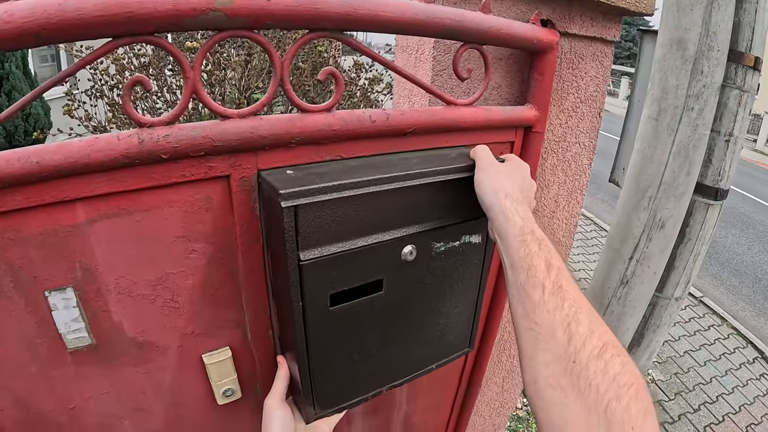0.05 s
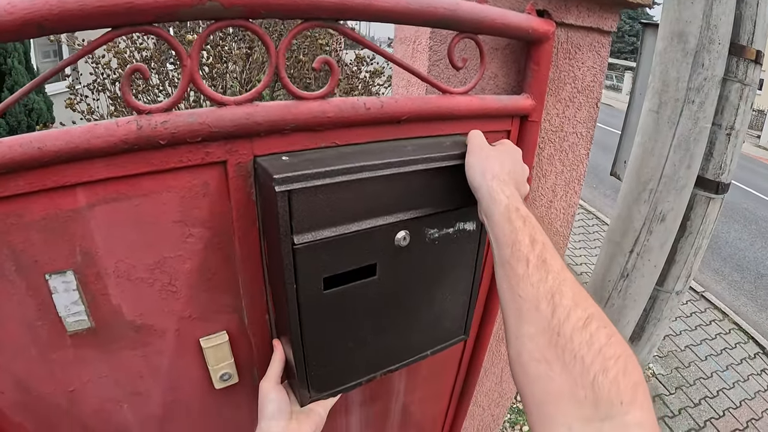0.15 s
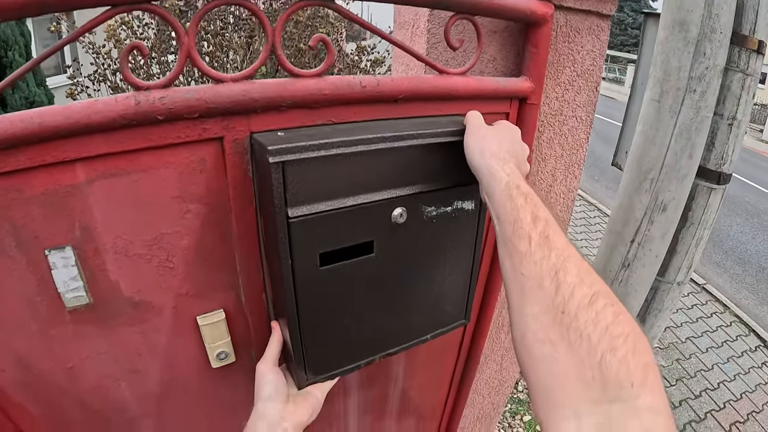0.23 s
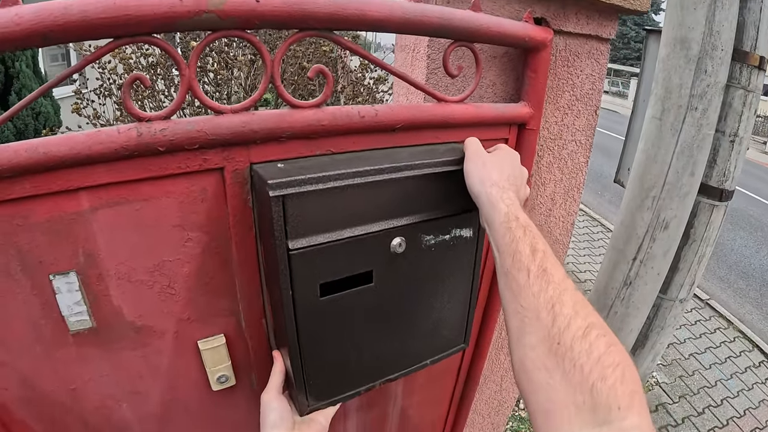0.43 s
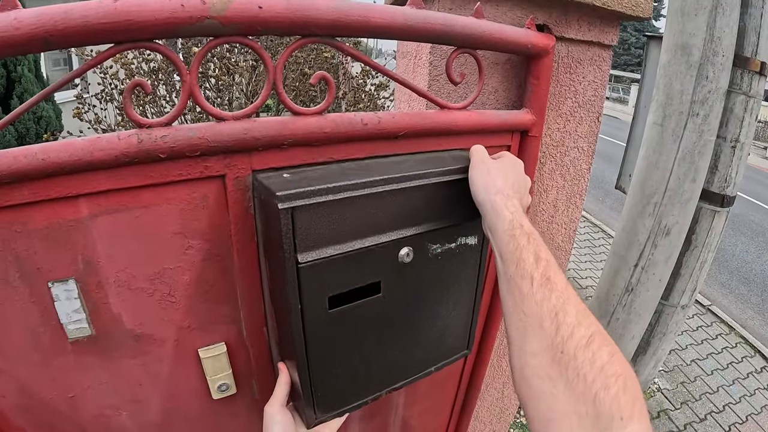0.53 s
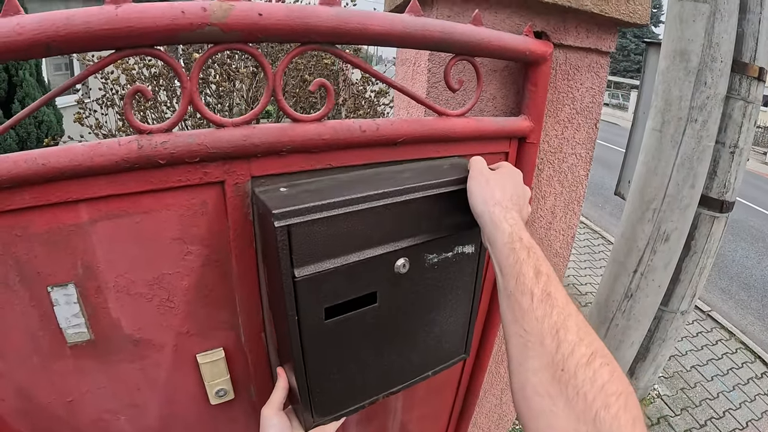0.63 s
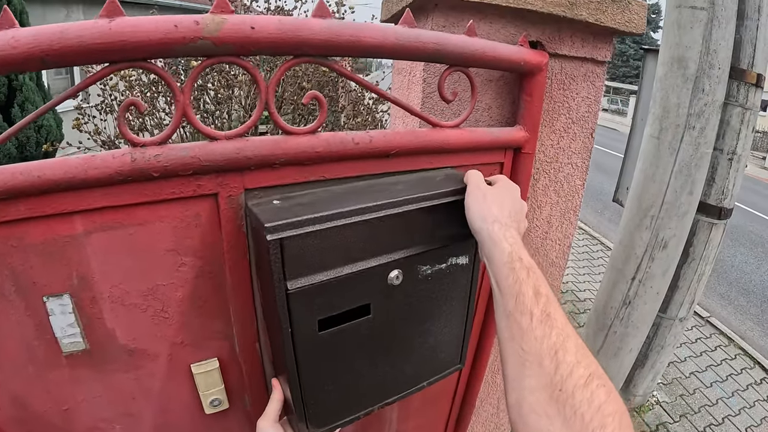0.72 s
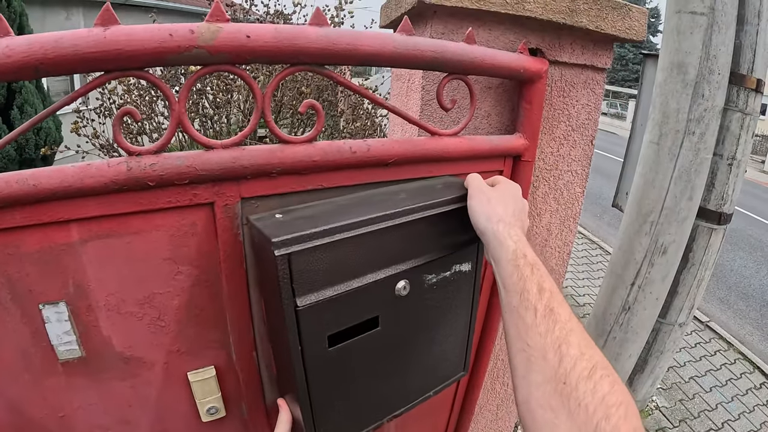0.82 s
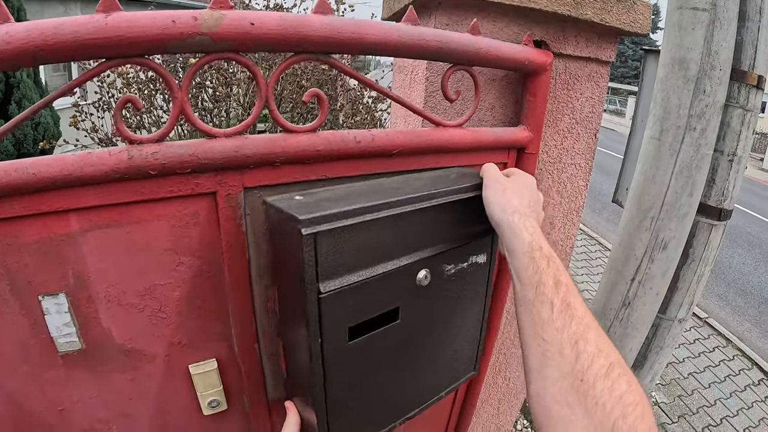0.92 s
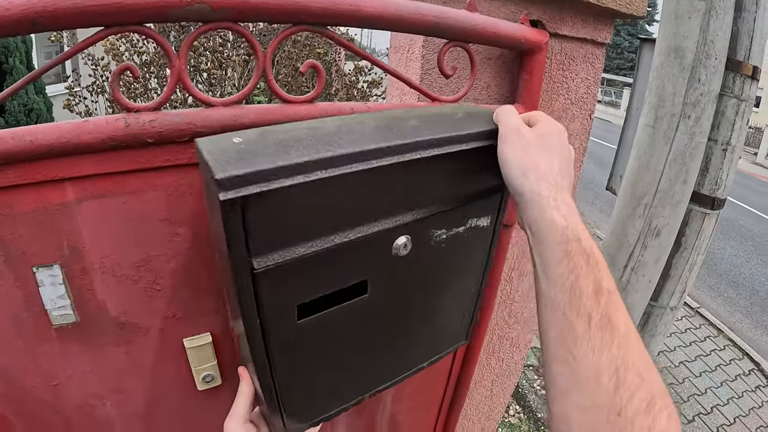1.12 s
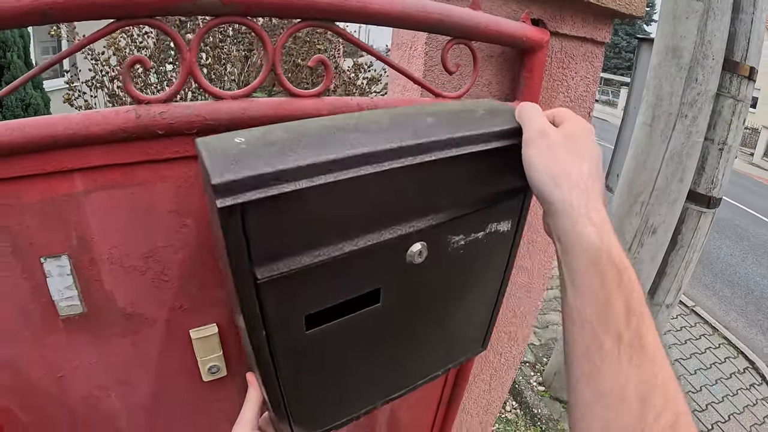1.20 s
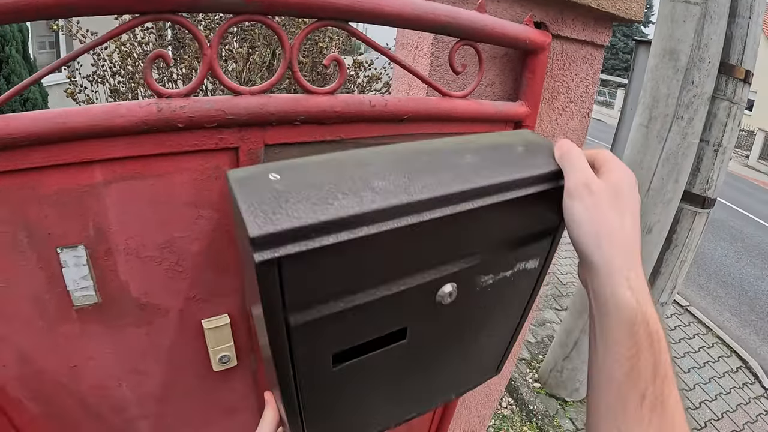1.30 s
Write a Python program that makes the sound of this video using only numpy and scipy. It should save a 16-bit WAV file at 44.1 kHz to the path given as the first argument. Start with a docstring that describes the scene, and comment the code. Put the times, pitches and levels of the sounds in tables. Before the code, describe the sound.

Close outdoor sound of a sheet-metal box pulled about against a gate: clacks and hollow thuds, brief lull, a heavy ringing clatter with squeal, one more strong blow, then fading scrapes and low booms beside a quiet street.

```python
"""A sheet-metal mailbox is worked loose from a steel gate, close to the microphone, beside a quiet street.
Over a steady street murmur its edges start to drag; the hollow box thuds, the gate panel hums low,
edges clack in washes of sheet ringing, and a rubbing edge squeals, a sine gliding in pitch.
After a near pause come louder thuds, clear wall rings and clacks, a second squeal, and one more heavy blow;
then sparse weak clacks and thuds, the drag dying away and last low booms of the panel."""
import sys
import numpy as np
from scipy import signal
from scipy.fft import rfft, irfft
from scipy.io import wavfile
from scipy.ndimage import uniform_filter1d

SR = 44100
rng = np.random.default_rng(int(sys.argv[2]) if len(sys.argv) > 2 else 0)


def digitize_waveform(pressure):
    """Quantize a signal to 16-bit integers and store it at the path in sys.argv[1].

    Rows of a 2-D input are taken as channels; values are limited to [-1, 1].
    """
    field = np.atleast_2d(pressure).T
    bounded = np.clip(field, -1, 1)
    quanta = np.round(bounded * 32767).astype(np.int16)
    wavfile.write(sys.argv[1], SR, quanta)


def amplitude_ratio(level_db):
    """Convert a level in decibels to the matching linear amplitude (field) ratio."""
    exponent = np.asarray(level_db, float) / 20
    return 10 ** exponent


N = 59535
T = np.arange(N) / SR
RUN_IN = 8192   # samples for filters to settle


def rms_one(x):
    """Scales to rms 1."""
    return x / np.sqrt(np.mean(x ** 2) + 1e-20)


def at_hz(points, hz):
    """Reads a spectrum table on a log frequency axis."""
    table_hz, value = np.array(points).T
    return np.interp(np.log(hz), np.log(table_hz), value)


def in_time(rows):
    """Columns of a curve, sample by sample."""
    s, *columns = np.transpose(rows)
    return [np.interp(T, s, column) for column in columns]


def drift(rate_hz):
    """Random wander with rms 1: white noise through a two-pole low-pass."""
    pole = np.exp(-2 * np.pi * rate_hz / SR)
    noise = rng.standard_normal(N + SR)
    return rms_one(signal.lfilter([1], [1, -2 * pole, pole * pole], noise)[SR:])


def decay(age, t60, rise_s):
    """Quick rise, exponential fall; silent before the blow."""
    age = np.maximum(age, 0)
    rise = 1 - np.exp(-age / rise_s)
    return rise * np.exp(-np.log(1000) * age / t60)


def near(hz, centre_hz, octaves):
    """Weight of modes around a favoured pitch."""
    return np.exp(-(np.log2(hz / centre_hz) / octaves) ** 2 / 2)


def struck(start_s, hz, gain, t60, rise_s):
    """Rings a set of modes from one start, neighbours in opposite phase, each with a chance strength."""
    spread_db = 3
    out, i = np.zeros(N), int(start_s * SR)
    age = T[:N - i][:int(0.8 * SR)]   # a ring lasts 0.8 s at most
    polarity = (-1) ** np.arange(len(hz))
    gain = gain * amplitude_ratio(spread_db * rng.standard_normal(len(hz))) * polarity
    ring = decay(age, t60[:, None], rise_s) * np.sin(2 * np.pi * hz[:, None] * age)
    out[i:i + len(age)] = gain @ ring
    return out


def bands(spectrum, likeness, source):
    """Half-octave bands of stereo noise, total rms about 1: yields centre Hz and band."""
    edges = 22 * 2 ** np.arange(0, 9.6, 0.5)
    centres = np.sqrt(edges[1:] * edges[:-1])
    gains = amplitude_ratio(at_hz(spectrum, centres))
    gains = gains / np.sqrt(np.sum(gains ** 2 * np.diff(edges)) / (SR / 2))
    for k, hz in enumerate(centres):
        if gains[k] > gains.max() / 3000:   # skip very weak bands
            band_pass = signal.butter(3, edges[k:k + 2], "band", fs=SR, output="sos")
            # neighbouring bands take turns on two pairs of noises
            mid, side = signal.sosfilt(band_pass, source[k % 2])[:, RUN_IN:]
            alike = np.clip(at_hz(likeness, hz), -1, 1)
            stereo = np.sqrt(1 + alike) * mid + np.sqrt(1 - alike) * side * [[1], [-1]]
            yield hz, gains[k] * stereo / np.sqrt(2)


def sheet_noise():
    """Noise coloured by the many close modes of thin sheet."""
    modes, mode_width_hz = 350, 68
    hz = np.fft.rfftfreq(N + RUN_IN, 1 / SR)
    spikes = np.zeros(len(hz))
    spikes[rng.integers(0, len(hz) * 3 // 4, modes)] = rng.exponential(1, modes)
    offsets = hz[:400] - hz[200]
    resonance = 1 / (1 + (2 * offsets / mode_width_hz) ** 2)
    power = np.convolve(spikes, resonance, "same")
    smooth = uniform_filter1d(power, size=600) + 1e-9   # divided out: keeps peaks, evens the tone
    spectrum = rfft(rng.standard_normal((2, 2, N + RUN_IN)))
    return rms_one(irfft(spectrum * np.sqrt(power / smooth), N + RUN_IN))


# edges clacking on the gate: start_s [s], level_db [dB before the clack gain],
# tilt_db [dB per octave about 4 kHz], t60_s [s at 4 kHz]
CLACK_HITS = [(0.1749, -17.5, 2.5, 0.37), (0.2164, -22, -5, 0.19), (0.2457, -15, -1.5, 0.058),
              (0.2558, -16.5, 5, 0.15), (0.3031, -15, -2.5, 0.053), (0.3065, -14, 0.5, 0.2),
              (0.4694, -42, 2, 0.3), (0.509, -42, 4, 1), (0.5738, -21.5, -3, 0.27),
              (0.5881, -15, 5.5, 0.48), (0.6544, -29.5, 13.5, 0.063), (0.6955, -23, 4.5, 0.15),
              (0.7115, -9, 6.5, 0.17), (0.774, -20, 2.5, 0.16), (0.808, -19.5, 0.0, 0.19),
              (0.8652, -21.5, 6.5, 0.13), (0.904, -14.5, -4.5, 0.17), (0.9143, -12, 5, 0.28),
              (0.9683, -22.5, 6.5, 0.19), (1.1086, -30.5, 2, 0.15), (1.15, -38.5, -2, 0.21),
              (1.1835, -28.5, 3.5, 0.12)]
# dense ringing of thin sheet: pitch_hz [Hz], level_db [relative dB per Hz]
SHEET_COLOUR = [(350, -10.5), (1150, -2.5), (1560, -10), (2640, -4.5), (3200, -6), (5080, -8), (9630, -20),
                (14700, -19), (15500, -52)]
# stereo closeness of ringing and dragging: pitch_hz [Hz], likeness [left-right, 1 = same]
BOX_LIKENESS = [(60, 1), (500, 0.99), (2500, 0.8), (8000, 0.88), (14000, 0.56)]


def clacks():
    """Each clack sets off a dense wash of sheet ringing that dies faster in the treble."""
    gain_db, rise_s = -11, 0.00033
    treble_damping = 0.57   # t60 falls as this power of frequency
    start_s, level_db, tilt_db, t60_s = np.transpose(CLACK_HITS)[:, :, None]
    t60_s = np.clip(t60_s, 0.02, 2)
    out, coarse = 0, T[::8]   # envelopes drawn on every eighth sample
    for hz, band in bands(SHEET_COLOUR, BOX_LIKENESS, sheet_noise()):
        shape = decay(coarse - start_s, t60_s * (4000 / hz) ** treble_damping, rise_s)
        level = amplitude_ratio(level_db + gain_db + tilt_db * np.log2(hz / 4000))
        power = ((level * shape) ** 2).sum(axis=0)
        out = out + band * np.interp(T, coarse, np.sqrt(power))
    return out


# blows on the box body: start_s [s], level_db [dB before the thud gain],
# centre_hz [Hz, middle of the struck modes], t60_s [s]
THUD_HITS = [(0.167, -23.5, 344, 0.26), (.228, -12, 520, 0.069), (.233, -9, 296, 0.17),
             (0.307, -12, 553, 0.12), (.344, -27, 320, 0.5), (0.43, -33, 240, 0.53),
             (.574, -8.5, 640, 0.26), (0.581, -3, 314, 0.16), (0.592, -17.5, 300, 0.2),
             (0.614, -6.5, 318, 0.22), (0.636, -13, 293, 0.27), (0.672, -26, 300, 0.55),
             (0.698, -19.5, 367, 0.41), (0.793, -14.5, 387, 0.18), (0.9014, -4.5, 313, 0.2),
             (.919, -5, 322, 0.12), (0.967, -15.5, 297, 0.45), (1.004, -25, 260, 0.87),
             (1.085, -29, 218, 0.82)]
# modes of the hollow box: pitch_hz [Hz], level_db [relative dB]
BODY_MODES = [(146, 3), (190, -5.5), (236, -4), (282, 1.5), (332, 1), (360, -1), (395, -5.5), (422, -11),
              (460, -7), (500, -7.5), (672, -3), (960, -9.5), (1230, -6)]


def thuds():
    """Each thud favours the body modes around its centre; the hands damp the ring."""
    gain_db, width_octaves, rise_s = -9, 0.64, 0.001
    hz, mode_db = np.transpose(BODY_MODES)
    out = 0
    for start_s, level_db, centre_hz, t60_s in THUD_HITS:
        gain = amplitude_ratio(level_db + gain_db + mode_db) * near(hz, centre_hz, width_octaves)
        out = out + struck(start_s, hz, gain, np.full(len(hz), max(t60_s, 0.02)), rise_s)
    return out


# clear wall rings, mostly close to a clack or thud: start_s [s], pitch_hz [Hz], level_db [dB]
PING_HITS = [(.256, 3020, -37.0), (.31, 5850, -40.5), (.2575, 6150, -32.0), (.615, 661, -19.0),
             (.712, 3725, -24.0), (.712, 5098, -25.0), (.716, 9450, -39.0), (.725, 9850, -41.0),
             (.73, 2606, -36.0), (.776, 2680, -28.0), (1.05, 5850, -55.0), (1.15, 4400, -44.0),
             (.176, 4400, -30.0)]
# modes of the thin walls: pitch_hz [Hz], t60_s [s]
WALL_RINGS = [(661, 0.31), (2606, 0.19), (2680, 0.12), (3020, 0.7), (3725, 0.078), (4400, 0.12),
              (5098, 0.07), (5850, 0.25), (6150, 0.08), (9354, 0.31), (9510, 0.33), (9850, 0.3)]


def pings():
    """Wall panels ring out clearly, neighbouring rings sounding along; their level flickers quickly."""
    width_octaves, rise_s = 0.025, 0.00059
    hz, t60_s = np.transpose(WALL_RINGS)
    flicker = amplitude_ratio(1.7 * drift(95))   # level wander, dB and Hz
    out = 0
    for start_s, ring_hz, level_db in PING_HITS:
        gain = amplitude_ratio(level_db) * near(hz, ring_hz, width_octaves)
        out = out + struck(start_s, hz, gain, t60_s, rise_s)
    return flicker * out


# pressure of the dragging edges: time_s [s], level_db [dB before the drag gain]
DRAG_PRESSURE = [(.165, -54), (.19, -39.5), (.35, -48), (.44, -40.5), (.47, -46.5), (.565, -44.5),
                 (.6, -24.5), (.8, -36), (.9, -36), (.93, -36), (1.06, -42), (1.2, -54), (1.24, -89)]
# tone of the drag: pitch_hz [Hz], level_db [relative dB per Hz]
DRAG_TONE = [(100, -24), (170, -5.5), (339, -1), (385, -11.5), (1140, -17.5), (1800, -26), (5960, -40),
             (13000, -62)]


def drag():
    """Dense uneven grains of grit and paint under the dragging edges."""
    grains_per_s, spread_db, gain_db = 5000, 6.5, 6.5
    n = N + RUN_IN
    hits = rng.random(n) < grains_per_s / SR
    grains = hits * amplitude_ratio(spread_db * np.minimum(rng.exponential(1, n), 3))
    source = rms_one(uniform_filter1d(grains, size=24) * rng.standard_normal((2, 2, n)))
    pressure = amplitude_ratio(in_time(DRAG_PRESSURE)[0] + gain_db)
    return pressure * sum(band for _, band in bands(DRAG_TONE, BOX_LIKENESS, source))


# jolts to the gate panel: start_s [s], level_db [dB], shift_octaves [octaves from 94 Hz]
PANEL_JOLTS = [(0.173, -22.5, 0.95), (0.227, -16, 0.076), (.272, -13.5, 0.38), (0.329, -16, -0.31),
               (0.432, -19, 0.86), (0.576, -5, 1), (0.907, -23, 0.65), (0.988, -17, 0.091),
               (1.082, -18.5, 0.093), (1.208, -23, 0.083), (1.303, -16, -0.77)]
# low modes of the panel: pitch_hz [Hz], level_db [relative dB], t60_s [s]
PANEL_MODES = [(65.6, -3.5, 0.71), (93.14, -0.55, 0.9), (122.6, -5.5, 0.62), (146, 0, 0.13)]


def gate_panel():
    """Each jolt booms in the low modes of the gate."""
    width_octaves, rise_s = 0.39, 0.0017
    hz, mode_db, t60_s = np.transpose(PANEL_MODES)
    out = 0
    for start_s, level_db, shift_octaves in PANEL_JOLTS:
        gain = amplitude_ratio(level_db + mode_db) * near(hz, 94 * 2 ** shift_octaves, width_octaves)
        out = out + struck(start_s, hz, gain, t60_s, rise_s)
    return out


# squeals of a rubbing edge, one curve each: time_s [s], pitch_hz [Hz], level_db [dB rms]
SQUEAL_CURVES = [
    [(.209, 1128, -31.0), (.231, 1129, -29.5), (.241, 1128, -37.0), (.249, 1129, -30.0), (.3, 1125, -37.0),
     (.305, 1120, -26.0), (.314, 1120, -25.0), (.325, 1125, -41.0), (.333, 1135, -34.0),
     (.356, 1158, -33.0), (.372, 1160, -43.0)],
    [(.71, 1080, -37.0), (.724, 1124, -30.0), (.82, 1124, -30.5), (.835, 1170, -32.0), (.843, 1175, -42.0)],
]


def squeal():
    """Stick-slip tone, a sine fluttering slightly in pitch and level."""
    flutter_db, flutter_hz, pitch_jitter = 1.3, 45, 0.002   # jitter as a fraction of pitch
    out = 0
    for rows in SQUEAL_CURVES:
        hz, level_db = in_time(rows)
        sounding = 1.0 * (T > rows[0][0]) * (T < rows[-1][0])
        on = uniform_filter1d(sounding, size=400)   # soft edges
        phase = 2 * np.pi * np.cumsum(hz * (1 + pitch_jitter * drift(flutter_hz))) / SR
        level = np.sqrt(2) * amplitude_ratio(level_db + flutter_db * drift(flutter_hz))
        out = out + on * level * np.sin(phase)
    return out


def yard(x):
    """Diffuse echoes from wall and paving: a decaying noise tail, different on each side."""
    t60_s, level_db, delay_s, rise_s = 0.4, -24, 0.013, 0.0085
    half_second = SR // 2
    tail = rng.standard_normal((2, half_second)) * decay(T[:half_second] - delay_s, t60_s, rise_s)
    tail = tail / np.sqrt(np.sum(tail ** 2, axis=1, keepdims=True))
    return amplitude_ratio(level_db) * signal.fftconvolve(x, tail, axes=1)[:, :N]


# tone of the street: pitch_hz [Hz], level_db [relative dB per Hz]
STREET_TONE = [(20, 1.5), (125, 1.6), (165, -11), (250, -7.5), (350, -31), (1500, -28), (2000, -37.5),
               (5500, -43.5), (8000, -58), (11000, -68)]
# stereo closeness of the street: pitch_hz [Hz], likeness [left-right, 1 = same]
STREET_WIDTH = [(60, 0.99), (380, 0.99), (2380, 0.4), (15000, 0.96)]


def street():
    """Distant traffic murmur: steady coloured noise."""
    level_db = -37
    noise = rng.standard_normal((2, 2, N + RUN_IN))
    return amplitude_ratio(level_db) * sum(band for _, band in bands(STREET_TONE, STREET_WIDTH, noise))


def scene():
    """Box and gate slightly right, low excess of the struck sines' starts cut; echoes and street around."""
    bass_cut_hz, left_db = 97.5, -1.0   # left against right
    box = clacks() + pings() + thuds() + drag() + gate_panel() + squeal()
    bass_cut = signal.butter(2, bass_cut_hz, "high", fs=SR, output="sos")
    box = signal.sosfilt(bass_cut, box) * amplitude_ratio(left_db / 2 * np.array([[1], [-1]]))
    return box + yard(box) + street()


def low_pass(x):
    """Removes everything above the highest recorded frequency."""
    return signal.sosfilt(signal.butter(12, 15830, fs=SR, output="sos"), x)


def record(dry):
    """The microphone rolls off at the top."""
    treble_cut_hz = 10560
    roll_off = signal.butter(6, treble_cut_hz, fs=SR, output="sos")
    mix = signal.sosfilt(roll_off, dry)
    return low_pass(mix)


dry = scene()
out = record(dry)
digitize_waveform(out)
```